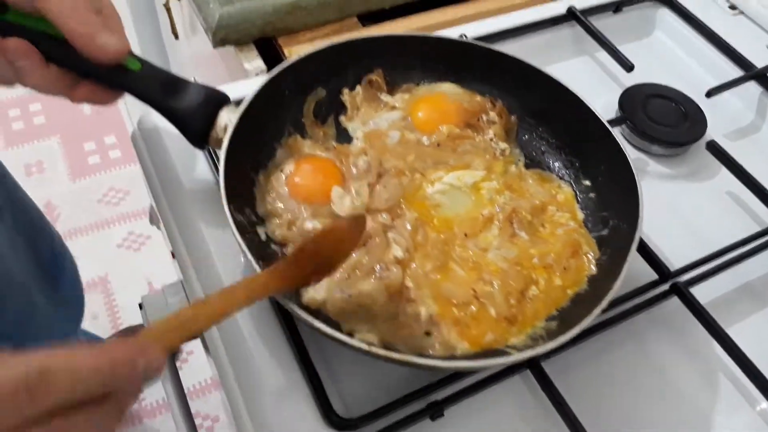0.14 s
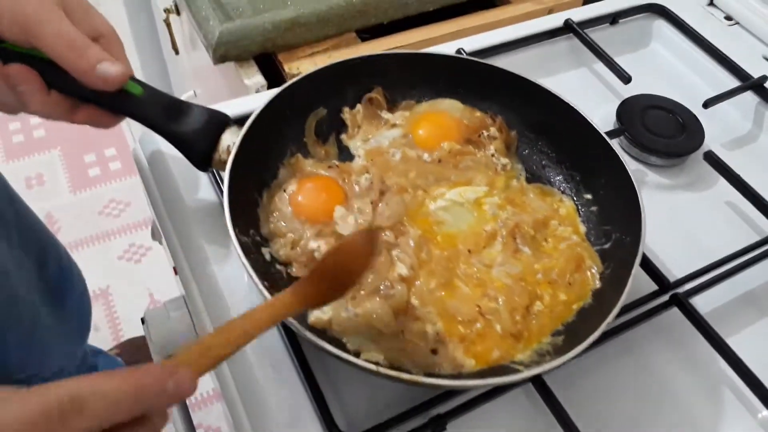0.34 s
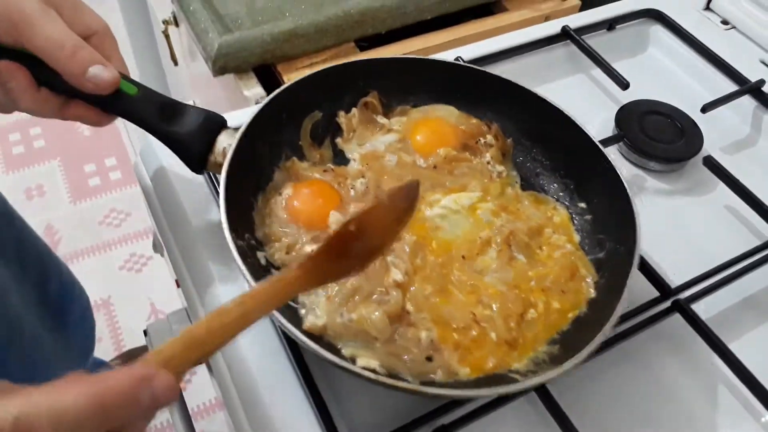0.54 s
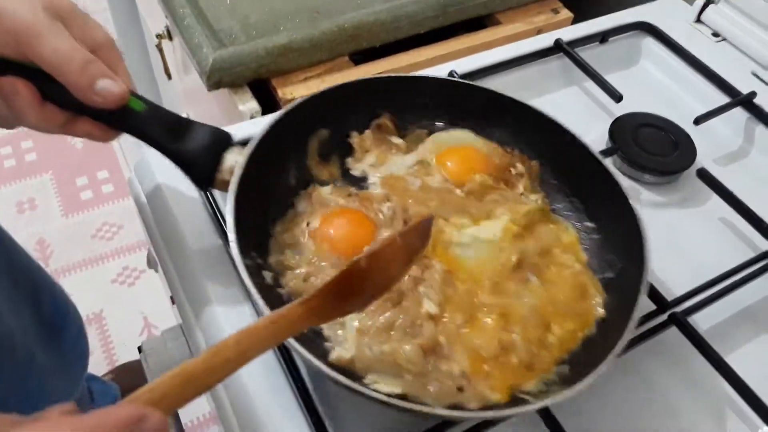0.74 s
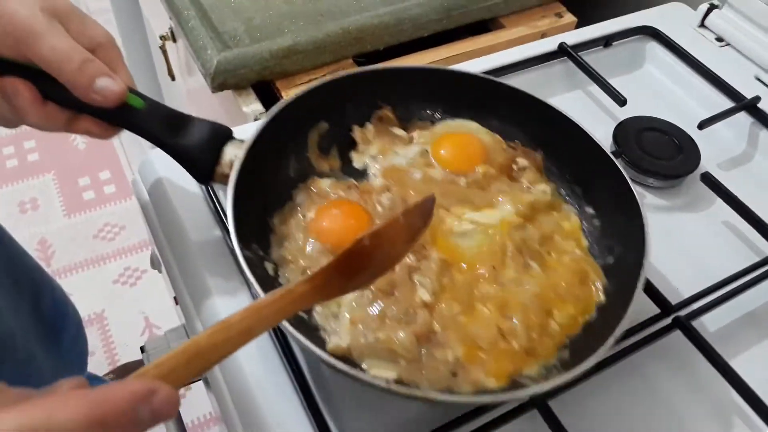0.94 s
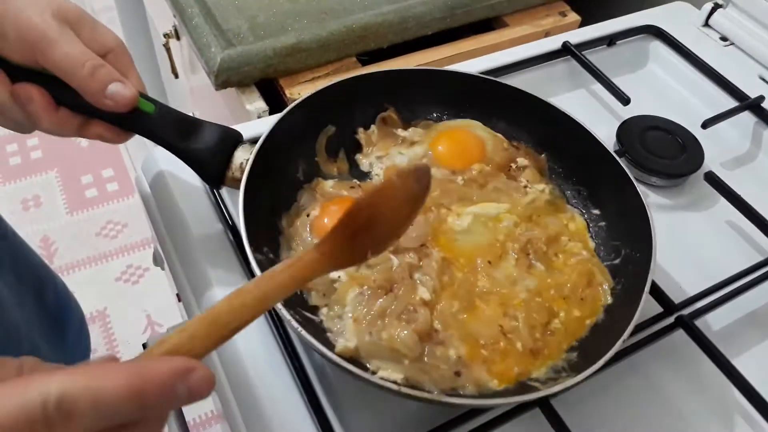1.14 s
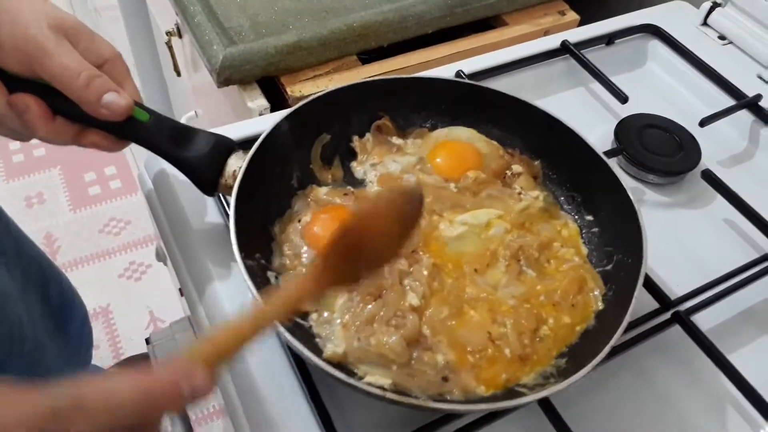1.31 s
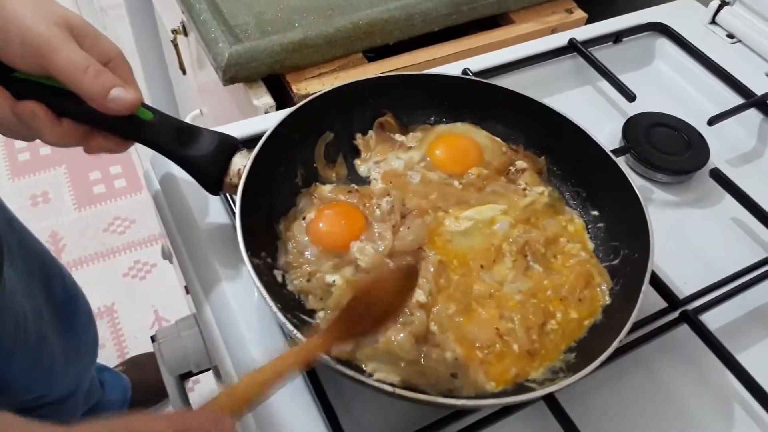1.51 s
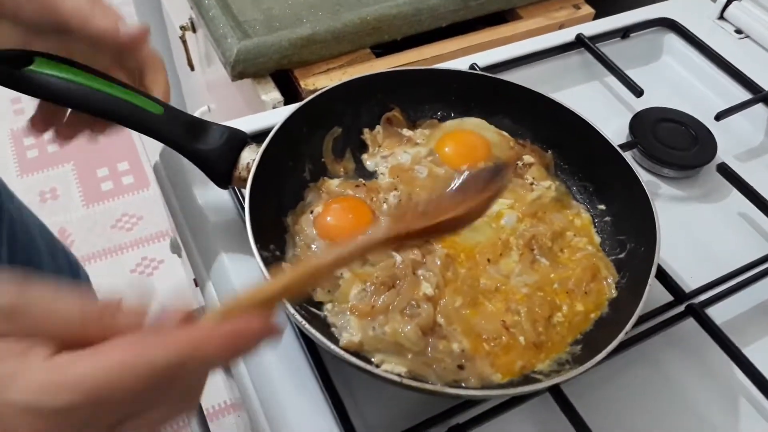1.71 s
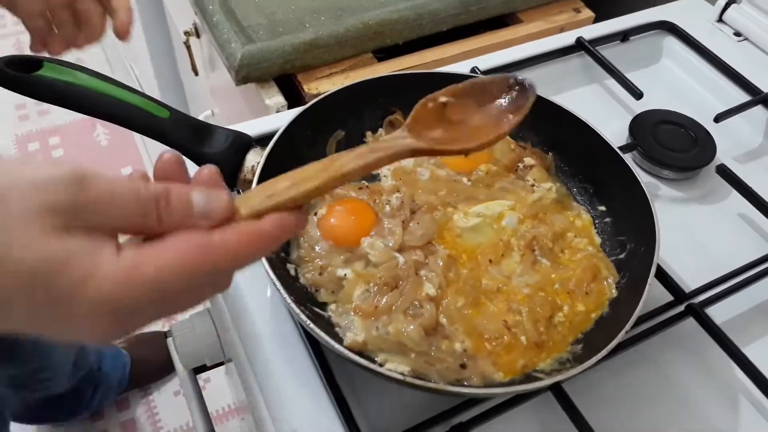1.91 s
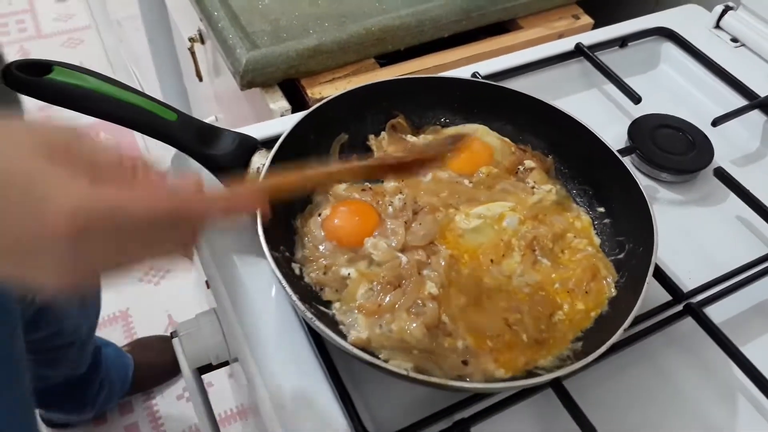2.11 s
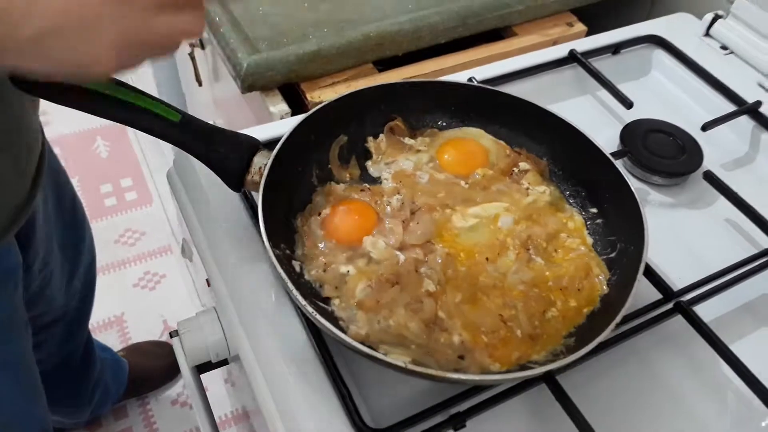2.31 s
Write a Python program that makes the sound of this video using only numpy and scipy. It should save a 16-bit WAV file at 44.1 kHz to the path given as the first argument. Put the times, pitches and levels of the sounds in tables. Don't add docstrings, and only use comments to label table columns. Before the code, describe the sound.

A wooden spoon raps a frying pan rim in quick hard knocks, the pan scrapes and clunks on the iron grate, then two more raps follow; faint sizzle, small hard kitchen, close overloaded microphone.

```python
import sys
import numpy as np
from scipy import signal
from scipy.io import wavfile

SR = 44100
rng = np.random.default_rng(int(sys.argv[2]) if len(sys.argv) > 2 else 0)


def unload_wav(signal):
    wavfile.write(
        sys.argv[1],
        SR,
        np.round(np.clip(np.atleast_2d(signal).T, -1, 1) * 32767).astype(np.int16),
    )


def gain_from_db(level_db):
    decades = np.asarray(level_db, float) / 20
    return 10 ** decades


N = 103635
TIME = np.arange(N) / SR


def rms_one(x):
    return x / np.sqrt(np.mean(x ** 2) + 1e-20)


def at_hz(points, hz):
    table_hz, value = np.transpose(points)
    return np.interp(np.log(hz), np.log(table_hz), value)


def filtered(x, order, hz, kind):
    return signal.sosfilt(signal.butter(order, hz, kind, fs=SR, output="sos"), x)


def drift(rate_hz):
    knots = rng.standard_normal(400)
    return np.interp(TIME * rate_hz, np.arange(400), knots)


def clicks(s, db):
    out = np.zeros(N)
    out[(np.asarray(s) * SR).astype(int)] = gain_from_db(db)
    return out


def grains(per_s, signs):
    present = rng.random(N) < per_s / SR
    return present * signs * gain_from_db(3.0 * np.minimum(rng.exponential(1, N), 3))


def decay(t60):
    return gain_from_db(-60 / (t60 * SR))


def ring(drive, hz, t60):
    r, w = decay(t60), 2 * np.pi * hz / SR
    return signal.lfilter([0, np.sin(w)], [1, -2 * r * np.cos(w), r * r], drive + 1e-18)


BOOM, BRIGHTNESS, KNOCK = 2, 3, 4


def strike(events, modes, column, chatter_db, spread_db=1):
    chatter_t60_s = 0.099
    s, force_db, extra = np.transpose(events)[[0, 1, column]]
    luck = spread_db * rng.standard_normal((len(s), len(modes)))
    grit = rng.standard_normal(N)
    out = 0
    for k, (hz, level_db, t60) in enumerate(modes):
        extra_db = extra * np.log2(hz / 1500) if column == BRIGHTNESS else extra
        hits = clicks(s, force_db + level_db + extra_db + luck[:, k])
        chatter = signal.lfilter([1], [1, -decay(chatter_t60_s)], hits + 1e-18) * grit
        out = out + ring(hits * (-1) ** k + gain_from_db(chatter_db) * chatter, hz, t60)
    return out


# (time [s], force [dB], pan hum [dB], brightness [dB per octave], knock [dB])
RAPS = [
    (0.2443, 2, -1.5, 2, 2),
    (0.2523, -3.5, -0.5, 3, 4),
    (0.3862, 5.5, 0.5, 1.1, 4),
    (0.434, -26, 11, 3.5, -15),
    (0.462, -29, 23.5, 5.5, 2),
    (1.4722, 5.5, 1, 1.7, 2.5),
    (1.505, 1, -34, 2, -21),
    (1.6278, 5.5, 2, 0.45, 1),
    (1.775, -28, 11, 1, -2),
]
# (time [s], force [dB], stove thud [dB], brightness [dB per octave], knock [dB])
CLUNKS = [
    (0.898, -13, 3.5, -6.5, 2.5),
    (0.9618, -31.5, 8, 2.5, 6.5),
    (1.1556, 2, -2.5, 0.74, 3.5),
    (1.190, -48, -11, 7, 2),
    (1.2365, -12, 3, -3, 7.5),
    (1.2898, -8.5, 1.5, -2.9, 5),
    (1.318, -46, -6, -2, -14),
    (1.3870, -20, 6.5, -5, 9.5),
    (2.0224, -42.5, 8, 5.5, -20),
]
# (frequency [Hz], level [dB], t60 [s])
PAN_HUM = [(122.6, -30.5, 0.73), (165.3, -29, 0.36), (246.8, -11.5, 0.34), (275, -14.5, 0.34),
           (382, -27.5, 0.37)]
# (frequency [Hz], level [dB], t60 [s])
STOVE_THUD = [(130, -31.5, 0.42), (172.4, -16.5, 0.093), (193.3, -10, 0.38), (257.6, -15.5, 0.27)]
# (frequency [Hz], level [dB], t60 [s])
SPOON = [(800, -17, .025), (1350, -12, .025), (1620, -7, .025), (2200, -13, .02)]
# (frequency [Hz], level [dB], t60 [s])
GRATE = [(732, -3.5, 0.038), (1260, -0.5, 0.04), (1914, -7.5, 0.047), (2140, -9, 0.048), (2555, -10, 0.057),
         (5750, -22, .03), (6700, -22, 0.033)]
# (frequency [Hz], level [dB], t60 [s])
PAN_RING = [(620, -26, .1), (775, -29, .09), (840, -25, .13), (1078, -27, .14), (1345, -25, .1),
            (1512, -26, .09), (1694, -23, .13), (1870, -25, .09), (1947, -25, .09), (2110, -25, .09),
            (2577, -25, .1), (2821, -28, .08), (3000, -28, .08)]


def blows():
    low_swell_s = 0.0049
    lows = strike(RAPS, PAN_HUM, BOOM, -36) + strike(CLUNKS, STOVE_THUD, BOOM, -36)
    r = np.exp(-1 / (low_swell_s * SR))
    swell = gain_from_db(17.5) * signal.lfilter([1 - r], [1, -r], lows)
    knocks = strike(RAPS, SPOON, KNOCK, -30) + strike(CLUNKS, GRATE, KNOCK, -34)
    return swell + knocks + strike(RAPS + CLUNKS, PAN_RING, BRIGHTNESS, -25, spread_db=2)


# (frequency [Hz], side against mid [dB])
SIDE_DB = [(40, -20), (150, -41), (1200, -38), (2500, -25), (5000, -16), (9000, -15.5), (14000, -3)]


def bands(spectrum, envelope):
    edges = 30 * 2 ** np.arange(0, 9.4, .5)
    centres = np.sqrt(edges[1:] * edges[:-1])
    white = rng.standard_normal((2, 2, N))
    total = np.sqrt(np.sum(gain_from_db(2 * at_hz(spectrum, centres)) * np.diff(edges)) * 2 / SR)
    out = 0
    for k, hz in enumerate(centres):
        mid, side = filtered(white[k % 2], 2, edges[k:k + 2], "band")
        stereo = mid + gain_from_db(at_hz(SIDE_DB, hz)) * side * [[1], [-1]]
        out = out + gain_from_db(at_hz(spectrum, hz)) / total * envelope(hz) * stereo
    return out


# (frequency [Hz], level [dB per Hz])
CLATTER = [(45, -22), (100, -7), (300, -7), (757, -3.5), (2910, -8.5), (4330, -15.5), (10500, -17.5),
           (15400, -37)]
# (frequency [Hz], t60 [s])
CLATTER_T60 = [(80, 0.73), (250, 0.81), (600, 0.39), (1500, 0.37), (4000, 0.23), (10000, .2)]
CLATTER_DB, CLATTER_RISE_S = -10.5, 0.0022
RISE_CYCLES = 1.5
CRACK_DB, CRACK_T60_S = 2, 0.056
EARLIER_BLOW_DB = -31.5
GRATE_LOW_LOSS_DB = -10


def clatter():
    events = RAPS + CLUNKS + [(0, EARLIER_BLOW_DB, 0, -9.5, 0)]
    s, force_db, _, tilt, _ = np.transpose(events)
    on_grate = np.arange(len(s)) >= len(RAPS)
    lumps = drift(100)

    def dying(power, t60, hz):
        rise = np.exp(-1 / ((CLATTER_RISE_S + RISE_CYCLES / hz) * SR))
        poles = np.convolve([1, -decay(t60) ** 2], [1, -rise])
        return signal.lfilter([1 - rise], poles, power + 1e-18)

    def envelope(hz):
        bright_db = tilt * np.log2(max(hz, 500) / 1500)
        loss_db = (hz < 130) * on_grate * GRATE_LOW_LOSS_DB
        power = clicks(s, force_db + bright_db + loss_db) ** 2
        tail = dying(power, at_hz(CLATTER_T60, hz), hz)
        crack = (hz > 400) * gain_from_db(2 * CRACK_DB) * dying(power, CRACK_T60_S, hz)
        return np.sqrt(tail + crack) * gain_from_db(0.71 * lumps + 2.16 * drift(39.43))

    return gain_from_db(CLATTER_DB) * bands(CLATTER, envelope)


# (time [s], level [dB])
SLIDE = [
    (0.66, -43),
    (0.699, -30),
    (0.735, -28),
    (0.739, -20.5),
    (0.766, -23),
    (0.775, -33.5),
    (0.83, -31.5),
    (0.892, -41),
]
# (frequency [Hz], level [dB], t60 [s])
SLIDE_BODY = [(265.5, 7, 0.07), (397, -8.5, 0.043), (514, 5, 0.036), (700, -1, 0.016), (770, -1, 0.02),
              (1000, -3.5, 0.01), (1380, -2, 0.011), (1820, -9, 0.024), (2160, -9, 0.022), (2780, -16, .03)]


def slide():
    ticks = grains(1500, rng.standard_normal(N))
    body = sum(gain_from_db(db) * rms_one(ring(ticks, hz, t60)) for hz, db, t60 in SLIDE_BODY)
    s, db = np.transpose(SLIDE)
    return rms_one(body) * gain_from_db(np.interp(TIME, s, db, left=-90, right=-90))


# (frequency [Hz], level [dB per Hz])
SIZZLE = [(40, -8), (300, 0), (560, -11.5), (1500, -2), (2800, -12.5), (5000, -20), (10500, -18),
          (14000, -31)]
SIZZLE_DB = -38
POPS_PER_S, POP_DB = 1800, -45


def sizzle():
    shared = drift(6.02)
    hiss = bands(SIZZLE, lambda hz: gain_from_db(.6 * shared + 1.5 * drift(25)))
    pops = filtered(grains(POPS_PER_S, rng.choice([-1, 1], N)), 2, [4000, 11000], "band")
    return gain_from_db(SIZZLE_DB) * hiss + gain_from_db(POP_DB) * rms_one(pops)


ROOM_DB, ROOM_T60_S, ROOM_SIDE_DB = -12, .25, -26.5


def kitchen(x):
    t = np.arange(SR // 2) / SR
    fade = gain_from_db(-60 * t / ROOM_T60_S) * (t > .004)
    mid, side = rng.standard_normal((2, len(t))) * fade
    echo = mid + gain_from_db(ROOM_SIDE_DB) * np.diff(side, prepend=0) * [[1], [-1]]
    return signal.fftconvolve(x[None], echo / np.sqrt(np.sum(mid ** 2)))[:, :N]


def scene():
    near = filtered(blows() + slide(), 3, 95, "high")
    return near + gain_from_db(ROOM_DB) * kitchen(near) + clatter() + sizzle()


def band_limit(x):
    return signal.sosfilt(signal.butter(12, 15580, fs=SR, output="sos"), x)


def record(dry):
    overload, knee = 1.0, 6.0
    dry = filtered(dry, 2, 40, "high")
    flat = dry / (1 + np.abs(dry / overload) ** knee) ** (1 / knee)
    cut = signal.sosfilt(signal.cheby2(10, 45, 15600, fs=SR, output="sos"), flat)
    return band_limit(np.clip(cut, -1, 1))


dry = scene()
out = record(dry)
unload_wav(out)
```